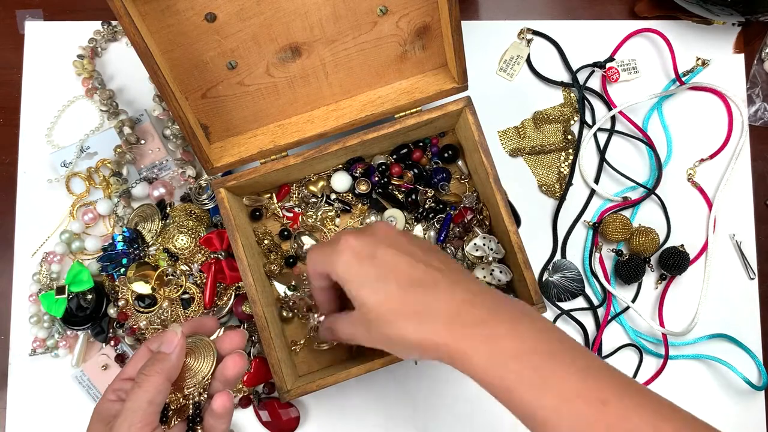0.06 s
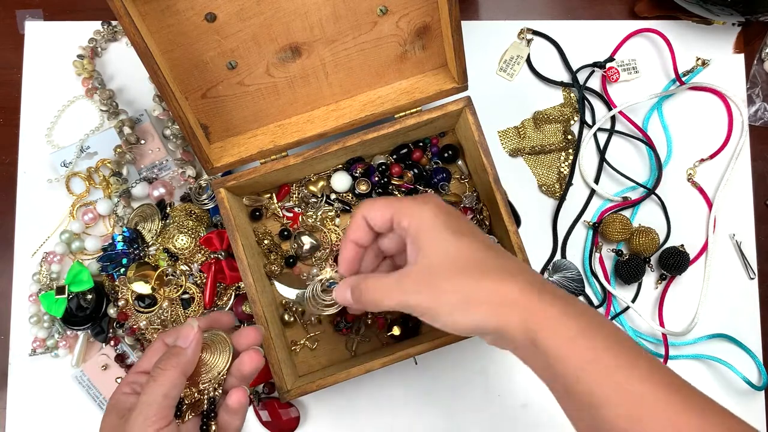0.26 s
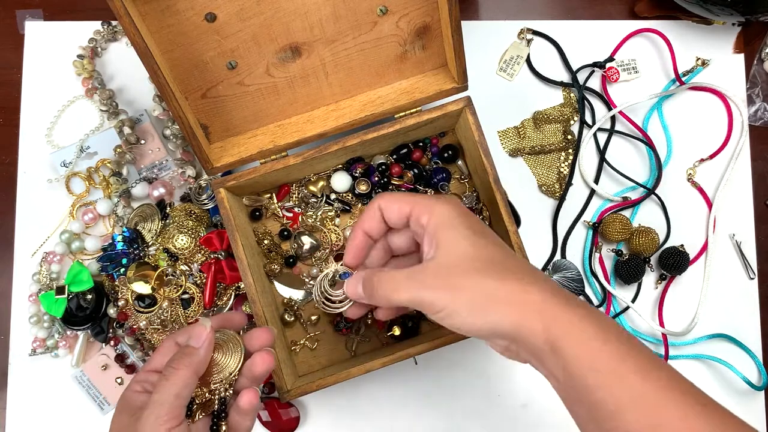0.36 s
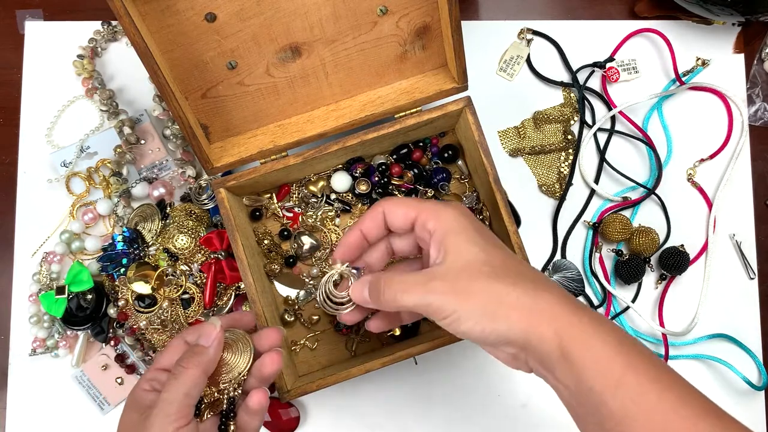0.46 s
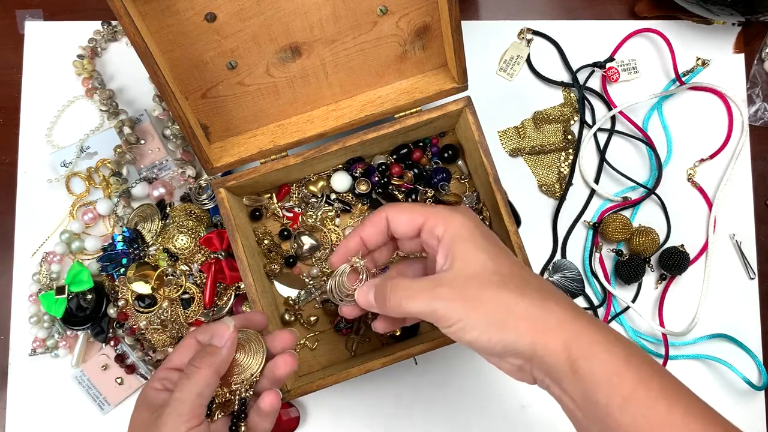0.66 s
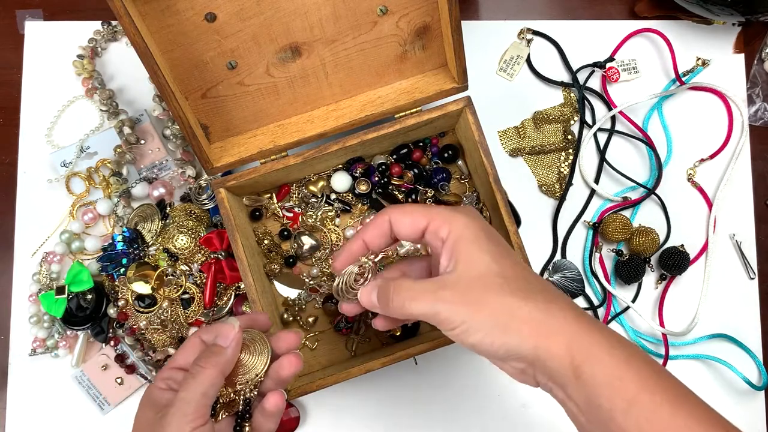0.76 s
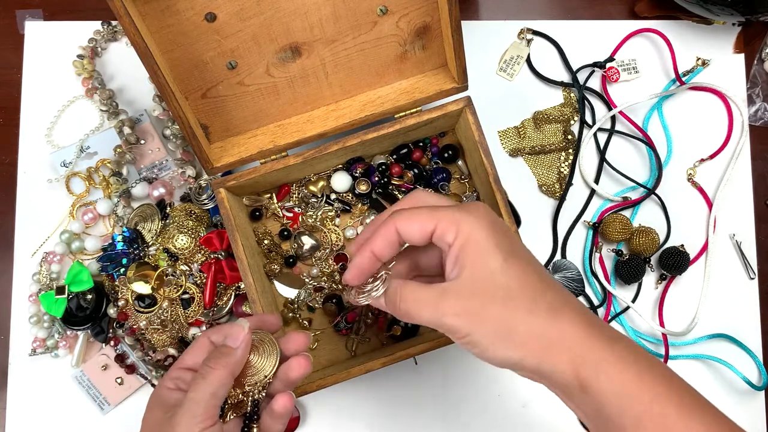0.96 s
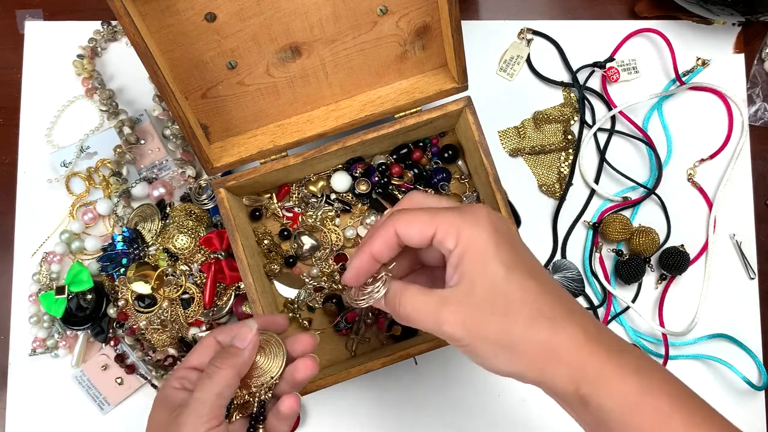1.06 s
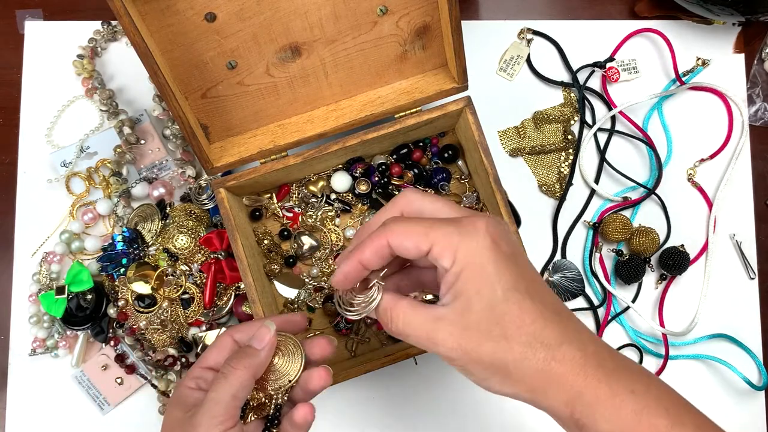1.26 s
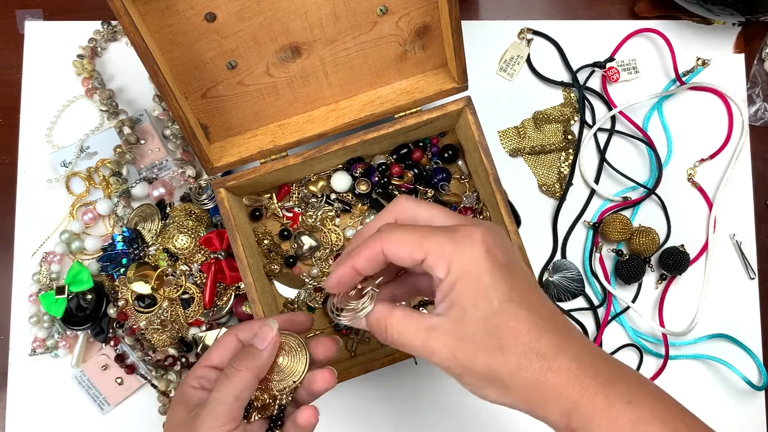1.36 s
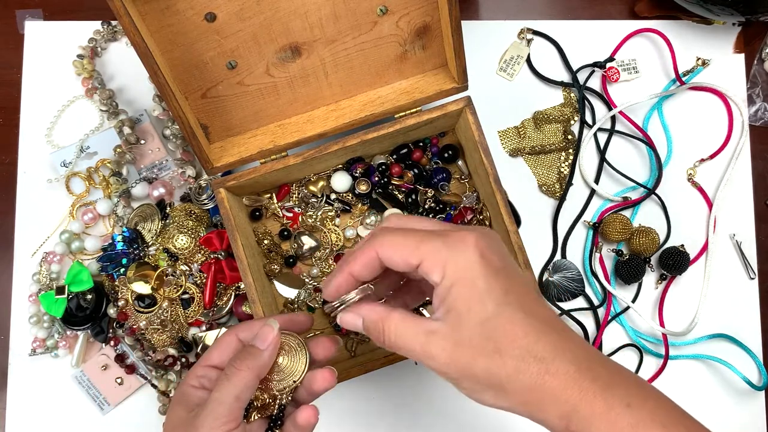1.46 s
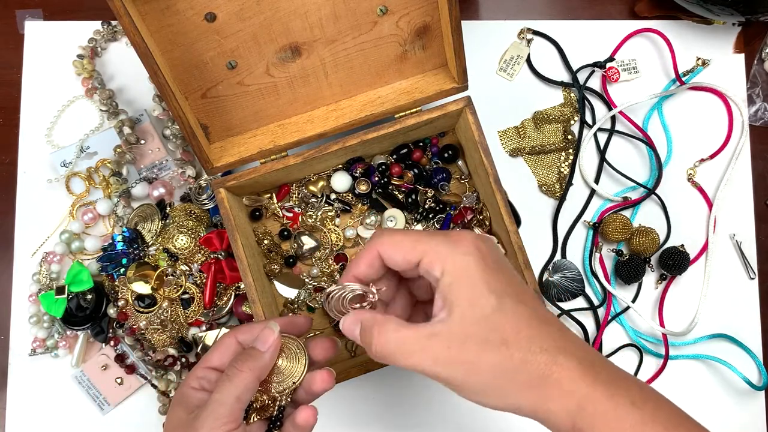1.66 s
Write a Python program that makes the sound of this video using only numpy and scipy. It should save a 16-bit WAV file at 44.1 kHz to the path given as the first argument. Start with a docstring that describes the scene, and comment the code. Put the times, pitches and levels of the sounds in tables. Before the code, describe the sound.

Light, bright clinks of metal jewelry being picked out of a wooden box.

```python
"""Metal hoops lifted from a jewelry box.

Fingers lift three thin hoops out of a wooden box and turn them over. The hoops clink and chatter, each
ringing in its own high modes until gripped. Beads and chains shift against the wood; a hand brushes
the table. A small room hums underneath, with a slowly rising drone and a faint tone that swells twice."""
import sys
import numpy as np
from scipy import signal
from scipy.fft import rfft, irfft, next_fast_len
from scipy.io import wavfile
from scipy.ndimage import uniform_filter1d

SR = 44100
rng = np.random.default_rng(int(sys.argv[2]) if len(sys.argv) > 2 else 0)


def pcm_store(signal):
    """Save signal as 16-bit PCM."""
    levels = np.round(np.clip(np.atleast_2d(signal), -1, 1) * 32767)
    wavfile.write(sys.argv[1], SR, levels.astype(np.int16).T)


N = 74970

# room noise spectra: freq_hz, gain_db
RUMBLE_SPECTRUM = [(20, -23), (38, -1.5), (55, 11.5), (72, 8.5), (95, 9.5), (160, -2.5), (260, -8),
                   (400, -20.5), (1000, -53)]
HISS_SPECTRUM = [(100, -6.5), (300, 16.5), (600, -11), (1150, -12), (2000, -11.5), (3500, -5.5),
                 (8000, -14), (15500, -10.5)]
# steady hum: pitch_hz, level_db
HUM_TONES = [(106.7, -49), (86, -64)]
# rising drone: time_s, pitch_hz, level_db
DRONE_PATH = [(0, 130.1, -72.5), (.6, 135, -55.5), (1.05, 140.7, -54.5), (1.4, 145.2, -55),
              (1.7, 150, -61.5)]
# wavering tone, one list per swell: time_s, pitch_hz, level_db
SWELL_PATHS = [
    [(.04, 367.2, -76.5), (.12, 381, -62.5), (.16, 397.4, -67), (.2, 385, -67), (.265, 383, -66),
     (.29, 396, -98)],
    [(.71, 341, -82), (.765, 357.6, -59.5), (.795, 348, -66.5), (.82, 373.6, -61.5), (.86, 373, -54),
     (.888, 387, -74), (.915, 371.4, -61), (.96, 374, -64), (.995, 373, -80.5), (1.028, 347.3, -63),
     (1.07, 354, -71)],
]
# hand on the table: time_s, level_db
BRUSH_ENVELOPE = [(0, -70), (.25, -59.5), (0.481, -66.5), (.68, -67), (.77, -59.5), (0.983, -63.5),
                  (1.08, -63), (1.257, -58.5), (1.42, -67), (1.549, -77.5), (1.7, -75.5)]
# skin friction: freq_hz, gain_db
BRUSH_SPECTRUM = [(150, 8.5), (400, 0), (850, -2.5), (1170, 2), (1450, -5.5), (1750, -4), (2400, -13),
                  (3600, -15.5), (4900, -16), (6000, -19), (8000, -21), (15500, -27.5)]
# table top: freq_hz, level_db, t60_s
TABLE_TOP_MODES = [(550, -6, .06), (710, -5, .05), (860, -2, .05), (1030, -4, .04), (1165, -1, .05),
                   (1420, -7, .03), (1640, -6, .03), (1830, -6, .04), (2270, -10, .03), (2800, -12, .02)]
# faint rubs: start_s, centre_hz, level_db, rise_s, decay_s
RUB_EVENTS = [(0.027, 4500, -69, .03, 0.062), (0.52, 8500, -66, .04, .08), (0.82, 1000, -64, 0.043, 0.055),
              (1.03, 2270, -67, 0.086, 0.043), (1.005, 4890, -68.5, 0.023, 0.12)]
# pile shifting on wood: start_s, level_db, rise_s, decay_s, highpass_hz
PILE_SHIFTS = [(0.08, -67, .0044, 0.031, 910), (.239, -53, 0.039, 0.09, 1100),
               (.3405, -41.5, 0.0005, 0.0013, 640), (.3515, -41.5, .0015, .006, 830),
               (.354, -45.5, 0.0012, 0.0016, 3150), (.384, -61.5, 0.0067, 0.021, 606),
               (.547, -66, .0021, .08, 615), (0.8178, -45.5, 0.003, 0.004, 435),
               (.825, -44, 0.0468, 0.02, 990), (.856, -47, 0.0061, 0.013, 3880),
               (0.8839, -43, 0.0024, 0.0034, 1114), (.916, -55, 0.031, 0.0087, 1160)]
# pile and box: freq_hz, gain_db
PILE_SPECTRUM = [(150, -9), (450, 7), (700, -1), (1080, -4.5), (1400, -2.5), (2000, 3.5), (2850, -2),
                 (3500, -5), (5500, -7), (9000, -22.5), (16000, -37.5)]
# box and trinkets: freq_hz, level_db, t60_s
PILE_MODES = [(1030, -3, .035), (1165, -4, .035), (1420, -7, .025), (1660, -4, .03), (1830, -3, .03),
              (2060, -3, .03), (2273, -3, .035), (3420, -8, .025), (3750, -6, .025), (4200, -7, .025),
              (4660, -6, .025), (5050, -7, .025), (5595, -10, .025), (6137, -8, .025)]
# hoop on hoop: start_s, hoop, contact_db, ring_db, rise_s, decay_s, t60_scale, upper_modes_db
HOOP_STRIKES = [ (0.077, "middle", -64, -72, 0.0071, 0.026, 0.37, 11),
                (.149, "middle", -62, -75, 0.0015, 0.018, 0.34, 0),
                (.172, "middle", -55, -58.5, 0.001476, 0.024, 0.22, 1),
                (.203, "wide", -49, -50.5, 0.0032, 0.036, 0.21, -6),
                (.218, "middle", -56, -41.5, 0.0024, 0.0053, 0.75, 1.5),
                (0.2369, "wide", -44, -39.5, 0.00089, .008, 0.43, -9),
                (0.2369, "middle", -44, -36.5, .002, .012, 1.6, -3.5),
                (0.2654, "middle", -39.5, -33, .0006, 0.014, 2.1, 5.5),
                (.272, "wide", -53, -37.5, 0.0048, 0.0071, 1.7, 3),
                (.281, "middle", -46, -37, 0.0011, 0.0045, 0.81, 15.5),
                (.2928, "wide", -36, -24, .0005, .002, 1.5, 4.5),
                (0.2932, "middle", -55, -27, .002, .009, .65, 5),
                (0.34, "thin", -38, -48, .001, 0.0026, .2, 6),
                (.352, "middle", -22, -20.5, 0.00096, 0.0048, 0.7, 6),
                (0.3505, "wide", -29.5, -29.5, .001, 0.014, .6, -25),
                (0.364, "middle", -54, -26.5, .003, .006, .8, 3),
                (.380, "wide", -38, -33, 0.0027, .003, 0.64, -9),
                (.398, "middle", -44, -40.5, .0015, 0.003, 0.2, -13),
                (0.5244, "thin", -63, -50.5, 0.00087, 0.0054, 0.24, -2),
                (0.5473, "thin", -42.5, -39, .0015, 0.0096, .5, -2),
                (.565, "middle", -40, -39, 0.0025, 0.0026, 0.13, 1),
                (0.593, "middle", -59, -82, .002, .009, .3, 8),
                (0.61, "thin", -53, -62, 0.00038, .005, 0.15, -9),
                (0.618, "thin", -59.5, -70, 0.0015, .004, 0.22, -15),
                (0.6505, "thin", -53.5, -53.5, .0015, 0.0024, 0.067, -16),
                (0.816, "thin", -32.5, -26, 0.0021, 0.003, 3.6, 4.5),
                (.823, "thin", -42.5, -30.5, 0.0036, 0.017, 0.74, -2),
                (0.833, "thin", -27.5, -19.5, .0005, 0.0031, 0.98, 5),
                (0.845, "thin", -26, -41, 0.0028, 0.015, .8, -18),
                (0.868, "middle", -36, -48, 0.0016, 0.0068, 0.46, -3.5),
                (0.887, "middle", -28, -36.5, 0.00119, 0.0013, 0.29, 4.5),
                (.918, "thin", -42, -72, 0.0013, .009, .15, 5),
                (.940, "middle", -45.5, -60, .002, 0.0044, .3, 2)]
# ring of each hoop: freq_hz, level_db, t60_s
MODES_BY_HOOP = { "wide": [(4685, -29, .08), (5588, -20, .07), (7582, 0, .065), (7660, -11, .05),
                 (12185, 0, .14)], "middle": [(5610, -26, .06), (8060, 0, .075), (8110, -8, .06),
                 (8280, -15, .04), (12570, -2, .075), (12800, -1, .075), (12875, -6, .06)],
                 "thin": [(7675, 0, .09), (7780, -5, .06), (8075, -9, .05), (8936, -16, .06),
                 (10030, -15, .08), (10600, -15, .08), (11230, -16, .09), (12170, -6, .055),
                 (12690, -3, .045), (12930, -1, .045), (13020, -1, .045)]}
# metal contact: freq_hz, gain_db
CONTACT_SPECTRUM = [(300, -46.5), (1500, -24.5), (2900, -21.5), (3500, -21.5), (6400, -17), (7200, -5),
                    (8300, -10), (9200, -2.5), (10400, 4), (11400, 0.5), (13000, -4.5), (14300, -3),
                    (15600, -3.5)]
# fingers closing on the hoops: time_s
GRIP_TIMES_S = [.31, .405, .66, .89, .96]
# left channel behind right: freq_hz, lag_rad
LEFT_LAG = [(0, 0), (1000, .8), (2000, 1.5), (4000, 1.9), (8000, 2.17), (16000, 2.2)]

LOW_PAN_DB, METAL_PAN_DB = -3, .4  # left minus right
BOX_WIDTH, METAL_WIDTH = .7, .14
ROOM_DB, ROOM_DELAY_S, ROOM_T60_S = -14.5, .0089, .12
BRUSH_RIPPLE_DB, RUB_BAND_HZ = 1.5, 550
MODE_SPREAD_DB, RING_ONSET_S = 2, .0005
UPPER_MODES_HZ, GRIP_T60_S = 10000, .1
TOP_HZ = 15750


def undb(db):
    """Decibels to gain."""
    return 10 ** (np.asarray(db) / 20)


def level(x, db):
    """Set rms level."""
    return x * undb(db) / np.sqrt(np.mean(x ** 2))


def burst(x, db, window_s=.006):
    """Set rms level of the loudest window."""
    power = uniform_filter1d(x ** 2, int(window_s * SR), mode="constant")
    return x * undb(db) / np.sqrt(power.max())


def colour(x, spectrum):
    """Minimum-phase filter through (freq_hz, gain_db) points."""
    hz, db = np.array(spectrum, float).T
    size = next_fast_len(2 * x.shape[-1])
    size += size % 2
    bins_hz = np.maximum(np.arange(size // 2 + 1) * SR / size, 1)
    gain = undb(np.interp(np.log(bins_hz), np.log(hz), db))
    cepstrum = irfft(np.log(gain))
    cepstrum[1:size // 2] *= 2
    cepstrum[size // 2 + 1:] = 0
    return irfft(rfft(x, size) * np.exp(rfft(cepstrum)))[..., :x.shape[-1]]


def add(out, start_s, x):
    """Mix x in at start_s."""
    i = max(int(start_s * SR), 0)
    out[..., i:i + x.shape[-1]] += x[..., :N - i]


def pan(db):
    """Left and right gains, db apart."""
    return undb(np.array([[db], [-db]]) / 2)


def spread(mid, side, width):
    """Mid/side to left/right."""
    return mid + width * side * np.array([[1], [-1]])


def fade(t, t60_s):
    """Exponential decay, 60 dB per t60_s."""
    return np.exp(-np.log(1000) * t / t60_s)


def swell(t, rise_s, decay_s):
    """Linear rise, exponential decay."""
    return np.minimum(t / rise_s, 1) * np.exp(-np.maximum(t - rise_s, 0) / decay_s)


def stereo_noise(spectrum, width, db):
    """Steady coloured noise."""
    mid, side = colour(rng.standard_normal((2, N)), spectrum)
    return level(spread(mid, side, width), db)


def glide(path):
    """Sine along (time_s, pitch_hz, level_db) points."""
    t = np.arange(N) / SR
    time_s, hz, db = np.array(path).T
    phase = 2 * np.pi * np.cumsum(np.interp(t, time_s, hz)) / SR
    return np.sqrt(2) * np.sin(phase) * undb(np.interp(t, time_s, db))


def grains(size, rate_per_s, spread_db):
    """Tiny contacts, random in time and strength."""
    hit = rng.random(size) < rate_per_s / SR
    sign = rng.choice([-1, 1], size)
    strength_db = spread_db * np.clip(rng.standard_normal(size), -2, 2)
    return hit * sign * undb(strength_db)


def ring(force, modes, detune_share=.0008):
    """Force drives damped modes; level and tuning vary per call."""
    out, t = 0, np.arange(len(force)) / SR
    onset = 1 - np.exp(-t / RING_ONSET_S)
    for hz, db, t60_s in modes:
        level_draw, pitch_draw = rng.standard_normal(2)
        tuned_hz = hz * (1 + detune_share * pitch_draw)
        mode = np.sin(2 * np.pi * tuned_hz * t) * fade(t, t60_s) * onset
        driven = signal.fftconvolve(force, mode)[:len(t)]
        out = out + burst(driven, db + MODE_SPREAD_DB * level_draw)
    return out


def box_reflections(x, width, delay_s=.001, decay_s=.005):
    """Lid and wall reflections form the side signal; the left channel lags slightly."""
    t = np.arange(int(.02 * SR)) / SR
    impulse = rng.standard_normal(len(t)) * np.exp(-t / decay_s) * (t > delay_s)
    reflected = signal.fftconvolve(x, impulse / np.linalg.norm(impulse))[:N]
    left, right = spread(x, reflected, width)
    lag_rad = np.interp(np.fft.rfftfreq(N, 1 / SR), *np.array(LEFT_LAG).T)
    return np.array([irfft(rfft(left) * np.exp(-1j * lag_rad), N), right])


def room_reverb(x):
    """Add a short diffuse tail, independent per channel."""
    t = np.arange(N // 4) / SR
    impulse = rng.standard_normal((2, len(t))) * fade(t, ROOM_T60_S) * (t > ROOM_DELAY_S)
    tail = signal.fftconvolve(x, impulse / np.linalg.norm(impulse[0]), axes=1)[:, :N]
    return x + undb(ROOM_DB) * tail


def room_noise():
    """Low rumble and thin hiss."""
    rumble = stereo_noise(RUMBLE_SPECTRUM, width=.1, db=-58)
    hiss = stereo_noise(HISS_SPECTRUM, width=.96, db=-76)
    return rumble * pan(LOW_PAN_DB) + hiss


def room_hum():
    """Steady low tones, a rising drone, two faint swells."""
    t = np.arange(N) / SR
    steady = sum(np.sqrt(2) * undb(db) * np.sin(2 * np.pi * (hz * t + rng.random()))
                 for hz, db in HUM_TONES)
    swells = sum(glide(path) * (t > path[0][0]) * (t < path[-1][0]) for path in SWELL_PATHS)
    return (steady + glide(DRONE_PATH)) * pan(LOW_PAN_DB) + swells


def rubs():
    """Narrow bands of friction noise swell and fade."""
    out, t = np.zeros(N), np.arange(N // 3) / SR
    for start_s, centre_hz, db, rise_s, decay_s in RUB_EVENTS:
        edges_hz = [centre_hz - RUB_BAND_HZ / 2, centre_hz + RUB_BAND_HZ / 2]
        bandpass = signal.butter(2, edges_hz, "band", fs=SR, output="sos")
        friction = signal.sosfilt(bandpass, rng.standard_normal(len(t)))
        add(out, start_s, level(friction, db) * swell(t, rise_s, decay_s))
    return box_reflections(out, BOX_WIDTH)


def hand_brush():
    """Skin slides over the table: soft, uneven friction plus the ring of the top."""
    friction = stereo_noise(BRUSH_SPECTRUM, width=1, db=0)
    wood = np.array([ring(force, TABLE_TOP_MODES) for force in rng.standard_normal((2, N))])
    ripple_db = BRUSH_RIPPLE_DB * signal.resample(rng.standard_normal(120), N)
    envelope_db = np.interp(np.arange(N) / SR, *np.array(BRUSH_ENVELOPE).T)
    return level(friction + level(wood, db=-6.5), db=0) * undb(envelope_db + ripple_db)


def jewelry_pile():
    """Beads and chains slide and settle: dull grains ring the box and trinkets."""
    out, t = np.zeros(N), np.arange(N // 5) / SR
    for start_s, db, rise_s, decay_s, highpass_hz in PILE_SHIFTS:
        force = grains(len(t), rate_per_s=1500, spread_db=6) * swell(t, rise_s, decay_s)
        highpass = signal.butter(2, highpass_hz, "high", fs=SR, output="sos")
        force = signal.sosfilt(highpass, force)
        rattle = burst(colour(force, PILE_SPECTRUM), db=0)
        ringing = ring(force, PILE_MODES, detune_share=.018)  # each slide meets other trinkets
        add(out, start_s, burst(rattle + burst(ringing, db=-2), db))
    return box_reflections(out, BOX_WIDTH)


def finger_damping(start_s, t):
    """Ring gain: falls once the fingers next close."""
    grip_s = min(time_s for time_s in GRIP_TIMES_S if time_s > start_s)
    return fade(np.maximum(start_s + t - grip_s, 0), GRIP_T60_S)


def hoops():
    """Each strike breaks into dying chatter: a bright crackle and a ring that the fingers damp."""
    out, t = np.zeros(N), np.arange(N // 6) / SR
    for start_s, hoop, contact_db, ring_db, rise_s, decay_s, t60_scale, upper_db in HOOP_STRIKES:
        force = grains(len(t), rate_per_s=3400, spread_db=3.5) * swell(t, rise_s, decay_s)
        force[int(rise_s * SR)] = .2 * np.linalg.norm(force)  # one sure contact at the peak
        modes = [(hz, db + upper_db * (hz > UPPER_MODES_HZ), t60_s * t60_scale)
                 for hz, db, t60_s in MODES_BY_HOOP[hoop]]
        crackle = burst(colour(force, CONTACT_SPECTRUM), contact_db)
        ringing = burst(ring(force, modes), ring_db) * finger_damping(start_s, t)
        add(out, start_s, crackle + ringing)
    return box_reflections(out, METAL_WIDTH) * pan(METAL_PAN_DB)


def scene():
    """Jewelry and hand over the room's hum and noise."""
    return room_reverb(hoops() + jewelry_pile()) + hand_brush() + rubs() + room_hum() + room_noise()


def record(dry):
    """Steep low-pass at TOP_HZ."""
    return signal.sosfilt(signal.ellip(10, .2, 70, TOP_HZ, fs=SR, output="sos"), dry)


dry = scene()
out = record(dry)
pcm_store(out)
```